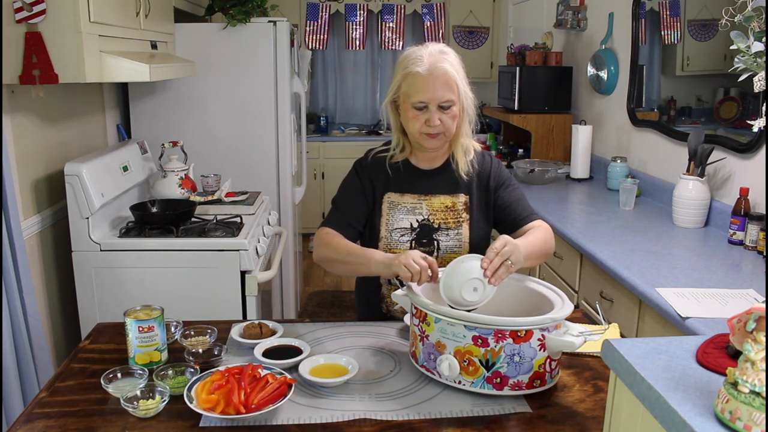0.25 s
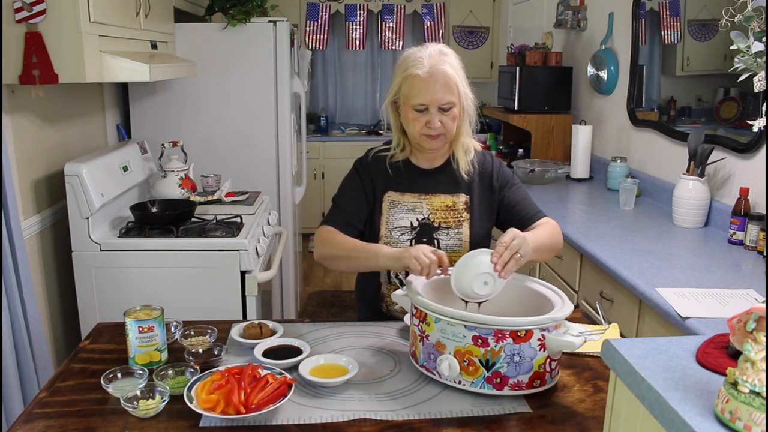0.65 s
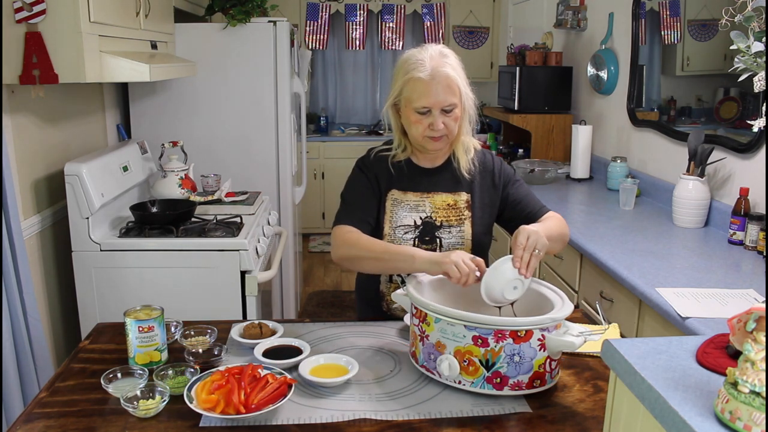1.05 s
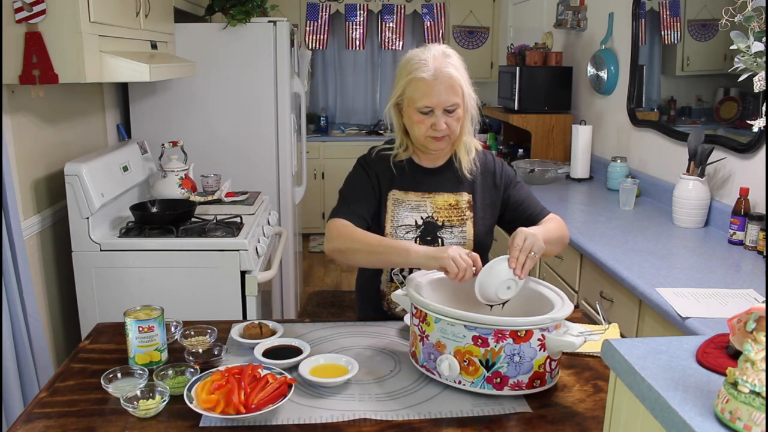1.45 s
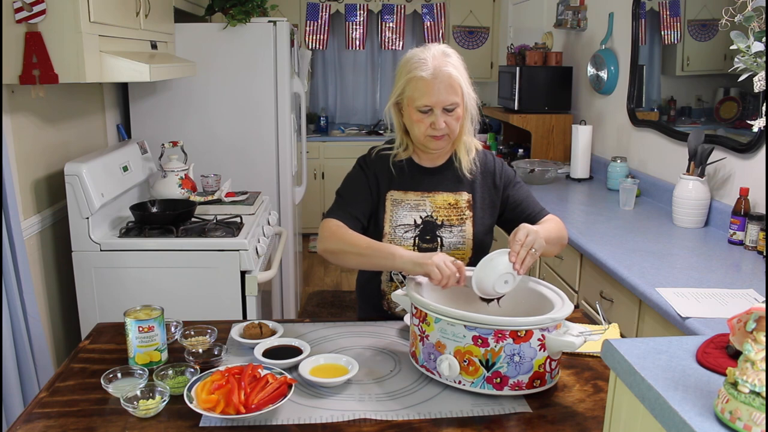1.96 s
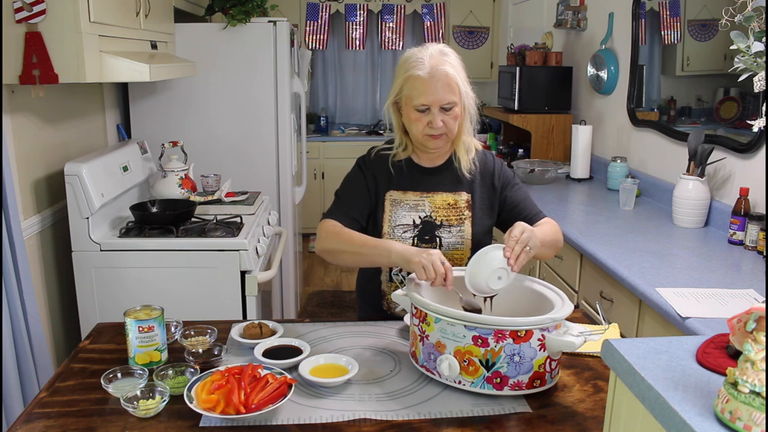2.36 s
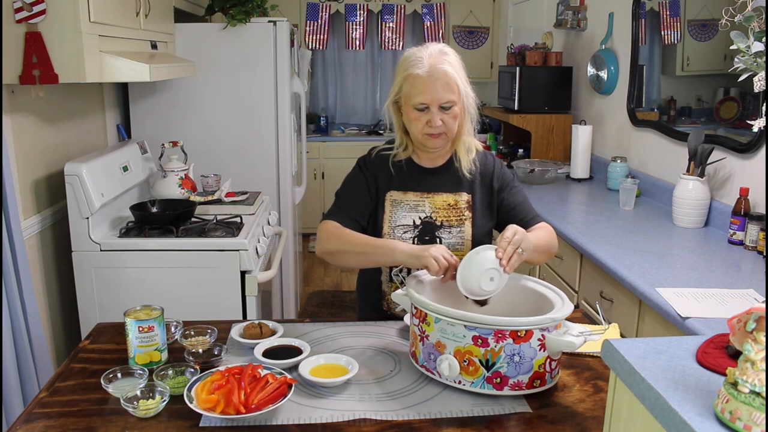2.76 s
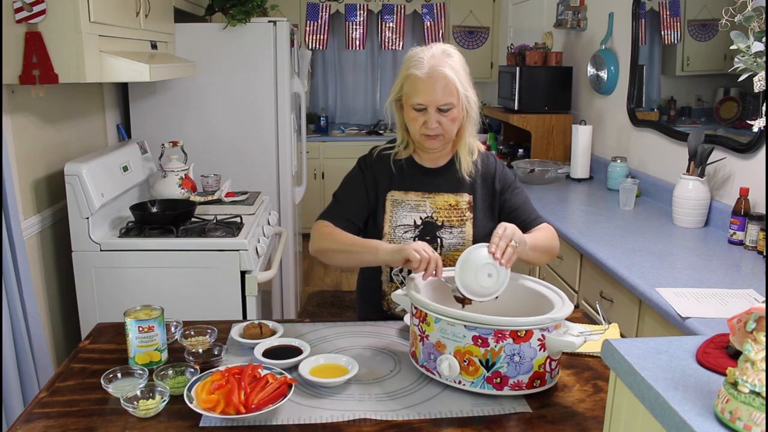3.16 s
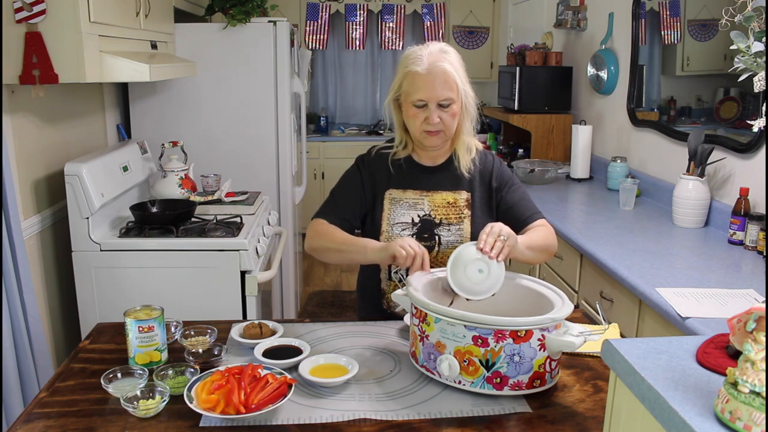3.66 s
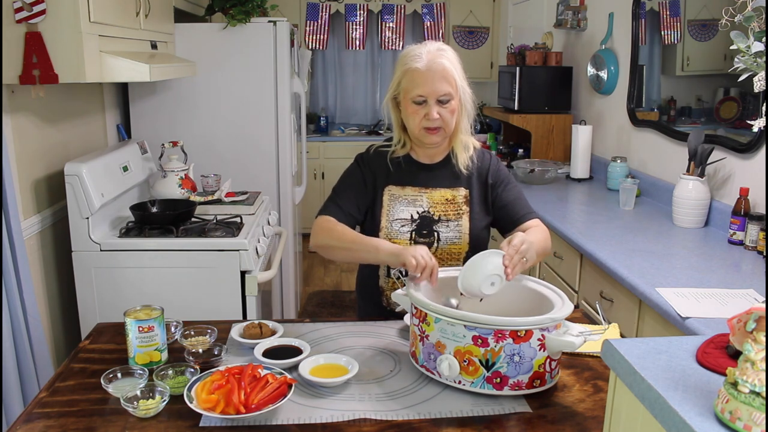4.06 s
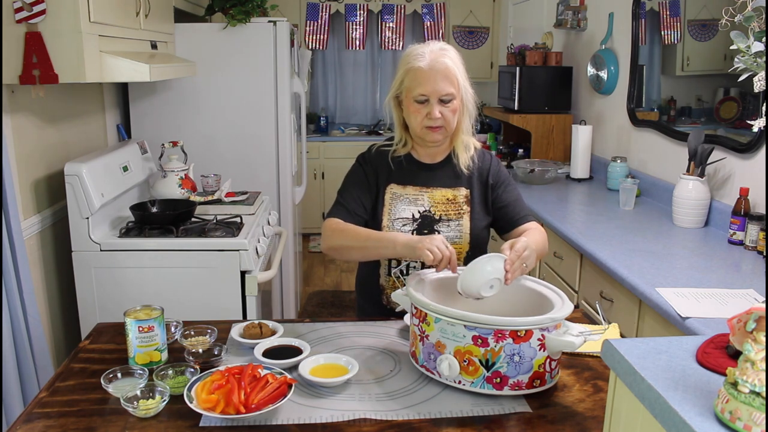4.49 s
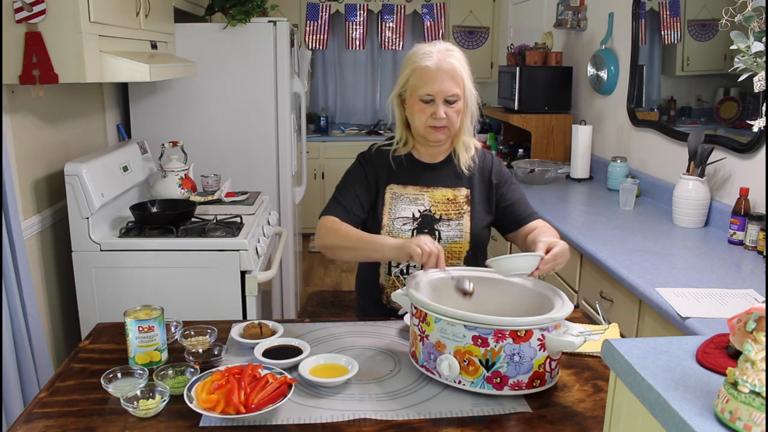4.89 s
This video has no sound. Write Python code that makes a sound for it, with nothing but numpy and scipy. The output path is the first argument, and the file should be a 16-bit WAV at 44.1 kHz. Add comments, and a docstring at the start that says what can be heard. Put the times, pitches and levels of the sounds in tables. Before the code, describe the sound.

In a home kitchen, thick sauce is knocked from a hand-held ceramic bowl with a metal spoon. Loud dry clinks come first, then a hollow stoneware double thud, quieter spoon contacts, faint rasps and wet smears, and a late hard clink with a scrape. Light pot taps end it. Short room echo, quiet hum and air; the microphone clips a little on the hardest blows.

```python
"""A metal spoon knocks thick sauce out of a small hand-held ceramic bowl, over a stoneware cooking pot.
Hard clinks come first, short because the hand damps the bowl: decaying modes, filtered cracks and echoes.
A dull double knock of the pot falls among them; then random stick-slip pulses make scrapes and smears, and single
filtered pulses make small ticks, with sparser clinks and more pot knocks; a last smear runs to the end.
Mains hum and filtered room noise lie underneath throughout; the hardest clinks overload the microphone."""
import sys
import numpy as np
from scipy import signal
from scipy.fft import next_fast_len
from scipy.io import wavfile

SR = 44100
rng = np.random.default_rng(int(sys.argv[2]) if len(sys.argv) > 2 else 0)


def to_wav(sig):
    """Store sig (one row per channel, or 1-D mono) as 16-bit WAV at the path in sys.argv[1].

    Samples outside -1..1 are clipped; the rate is SR.
    """
    pcm = np.clip(np.atleast_2d(sig), -1, 1) * 32767
    pcm = np.round(pcm).astype(np.int16)
    wavfile.write(sys.argv[1], SR, pcm.T)  # frames by channels


N = 226233


def amp(db):
    """Decibels to gain."""
    return 10 ** (np.asarray(db) / 20)


def unit(x):
    """Scales a sound to rms 1."""
    return x / np.sqrt(np.mean(x ** 2) + 1e-20)


def read(points, hz):
    """Reads a (frequency, value) table along a log-frequency axis."""
    f, value = np.transpose(points)
    return np.interp(np.log(hz + 1), np.log(f + 1), value)


def add(mix, s, sound):
    """Mixes a sound in at time s, cut where the mix ends."""
    part = mix[round(s * SR):][:len(sound)]
    part += sound[:len(part)]


def colour(x, points, tilt_db=0):
    """Minimum-phase filter with the given spectrum, tilted about 2 kHz by some dB an octave."""
    size = next_fast_len(len(x) + SR // 10)
    hz = abs(np.fft.fftfreq(size, 1 / SR))
    octaves = np.log2(np.maximum(hz, 200) / 2000)  # the tilt stops below 200 Hz
    log_gain = np.log(amp(read(points, hz) + tilt_db * octaves))
    response = np.exp(np.conj(signal.hilbert(log_gain)))  # causal: nothing sounds before the contact
    return np.fft.ifft(np.fft.fft(x, size) * response).real[:len(x)]


def fade(t, t60):
    """Exponential decay, 60 dB down after t60 seconds."""
    return np.exp(-np.log(1000) * t / t60)


def ring(modes, tilt_db=0, pivot_hz=1000):
    """Struck modes as decaying sines of alternating sign; the tilt in dB an octave weights the high ones."""
    t = np.arange(SR // 3) / SR
    total = 0
    for k, (hz, db, t60) in enumerate(modes):
        level = amp(db + tilt_db * np.log2(hz / pivot_hz))
        total = total + level * fade(t, t60) * np.sin(2 * np.pi * hz * t) * (-1) ** k
    return total


def pulse(points, tilt_db=0):
    """One contact: a push of energy 1 with the given spectral shape."""
    push = colour(signal.unit_impulse(SR // 20), points, tilt_db)
    return push / np.linalg.norm(push)


def stroke(start, press, end, swell, per_s, spread_db):
    """Pressure builds and lets go over one stroke: its gain, and its random stick-slip pulses."""
    t = np.arange(start, end, 1 / SR)
    size = amp(spread_db * np.minimum(rng.exponential(1, len(t)), 4)) * rng.choice([-1, 1], len(t))
    pulses = size * (rng.random(len(t)) < per_s / SR)
    pressure = np.interp(t, [start, press, end], [0, 1, 0]) ** swell
    return pressure, pulses


def kitchen(x, early_db, tail_db, direct_db=0, early_t60=.07, gap_s=0.0039):
    """Direct sound, quick echoes from bowl, pot and table, and the room's tail; paths are new for each sound."""
    # room decay: (frequency [Hz], t60 [s])
    room_decay = [(200, 0.46), (700, 0.39), (2300, 0.44), (5600, .37), (10000, 0.34), (15000, 0.2563)]
    t = np.arange(2 * SR // 3) / SR
    # sparse echoes of random sign, about 8000 a second
    near, far = rng.choice([-1., 1.], (2, len(t))) * (rng.random((2, len(t))) < 8000 / SR)
    near = near * (t > .0004) * fade(t, early_t60)
    # the tail is silent for one gap and rises over a second one
    hz, frame_s, z = signal.stft(far * np.clip(t / gap_s - 1, 0, 1), SR, nperseg=256)
    decay = fade(frame_s, read(room_decay, hz)[:, None])
    tail = signal.istft(z * decay, SR, nperseg=256)[1][:len(t)]
    paths = amp(early_db) * near / np.linalg.norm(near) + amp(tail_db) * tail / np.linalg.norm(tail)
    paths[0] += amp(direct_db)
    return signal.fftconvolve(x, paths)


def clinks():
    """Each blow rings bowl and spoon, then may rebound; its crack starts in the bowl and comes mostly by echoes."""
    # spoon on bowl: (time [s], force [dB], nearness to the rim [dB], spoon's own ring [dB],
    # crack tilt [dB/octave], main ring pitch [factor], ring length [factor],
    # rebound delay [s], rebound gain [factor])
    blows = [(0.1024, 10, -16.5, -23, -1, 1, 2, .008, 1.1),
             (0.4502, 9.5, 3, -23.5, 0.05, 0.99, 1.01, .0116, 0.35),
             (0.7787, 13, -4.5, -33.5, 1.5, 0.99, 0.89, 0, 0.11),
             (1.0765, 6.5, 1, -20, -1.7, .988, 1.01, .0105, 0.85),
             (1.6457, 0.5, 4, -24, -1.6, .995, 1.43, 0, 0),
             (2.5563, -6.5, -9.5, -16, 5.5, 1.01, 1.4, 0, 0.072),
             (4.262, 8.5, 4.5, -51, 1, 1.012, 0.68, .106, 0.083)]
    # spectral shape of the crack: (frequency [Hz], relative level [dB])
    crack_shape = [(100, -24), (400, -15.5), (600, -17), (850, -3), (1400, 2), (2500, 3), (3500, 3.5),
                   (4300, 2), (6000, 1), (7000, -2), (10000, -1), (15000, -7.5)]
    # the spoon falls back softly and stays in touch: less treble, set ring length
    rebound_dull_db, rebound_length = -11, 0.95
    out = np.zeros(N)
    for s, force_db, rim_db, spoon_db, crack_tilt, pitch, length, rebound_s, rebound_gain in blows:
        blow = s, force_db, rim_db, spoon_db, pitch
        add(out, s, chime(*blow, length))
        crack = amp(force_db) * pulse(crack_shape, crack_tilt)
        add(out, s, kitchen(crack, early_db=0, tail_db=-5.5, direct_db=-9.0, early_t60=0.084))
        add(out, s + rebound_s, rebound_gain * chime(*blow, rebound_length, rebound_dull_db))
    return out


def chime(s, force_db, rim_db, spoon_db, pitch, length, dull_db=0):
    """Bowl and spoon ring together; force and landing place set the weight of each mode family."""
    # a harder blow is a shorter contact, so higher modes grow faster; rows are low, main and high ring:
    # (level at force 0 [dB], growth with force [dB/dB], growth with nearness to the rim [dB/dB])
    bowl_response = [(-23, 1.2467, 0), (-15.5, 1.5754, 0.5), (-26.5, 2, 1)]
    # spoon modes in two families: (frequency [Hz], relative level [dB], t60 [s])
    spoon_low = [(3203, -10, 0.023), (4705, 0, 0.014), (4784, -8, 0.0083), (7650, -8.5, 0.014),
                 (7905, -6, 0.036)]
    spoon_high = [(11700, -5, .03), (11830, 0, .04), (14780, -8, .03)]
    low_db, main_db, high_db = np.dot(bowl_response, [1, force_db, rim_db])
    # high spoon modes against the low ones: -14.5 dB at force 0, 1.6 dB more per dB of force
    spoon_high_db = -14.5 + 1.6 * force_db + dull_db
    spoon = ring(spoon_low) + amp(spoon_high_db) * ring(spoon_high)
    body = bowl(low_db, main_db, high_db + dull_db, low_pitch(s), pitch, length)
    return kitchen(body + amp(force_db + spoon_db) * spoon, early_db=-5.5, tail_db=-7.0)


def low_pitch(s):
    """Pitch factor of the bowl's low modes at time s: they climb as the sauce leaves."""
    full_hz, emptying_hz_per_s, table_hz = 2283, 38, 2300  # table_hz: where the factor is 1
    return (full_hz + emptying_hz_per_s * s) / table_hz


def bowl(low_db, main_db, high_db, low_factor, main_pitch=1, length=1):
    """The bowl's ring: low modes follow the load of sauce, main ones shift with the grip, high ones stay."""
    # close pairs of modes, and broad ones that the touching spoon chokes, before pitch and length factors:
    # (frequency [Hz], relative level [dB], t60 [s])
    low_modes = [(2285.5, -3, 0.055), (2352, -3.5, .05), (2433, -5, 0.027)]
    main_modes = [(5197, -11, 0.013), (5472, -2, 0.024), (5594, 0, 0.04), (5692, -8.5, 0.036),
                  (5805, -8.5, 0.034), (6263, -15, 0.018)]
    high_modes = [(9720, -5, .02), (9900, 0, .035), (10120, -4, .04), (13700, -12, .025), (14930, -7, .03)]
    low = ring(np.multiply(low_modes, [low_factor, 1, length]))
    main = ring(np.multiply(main_modes, [main_pitch, 1, length]))
    high = ring(np.multiply(high_modes, [1, 1, length]))
    return amp(low_db) * low + amp(main_db) * main + amp(high_db) * high


def clacks():
    """A short dry clack under two of the clinks, perhaps the spoon catching the pot's rim: a filtered pulse."""
    # clacks: (time [s], level [dB])
    hits = [(0.1035, -2), (2.556, -3.5)]
    # spectral shape of the clack: (frequency [Hz], relative level [dB])
    clack_shape = [(200, -22.5), (600, -13), (1000, -8), (1420, 1), (1750, -6), (2300, -6.5), (2800, -23.5),
                   (15000, -37.5)]
    out = np.zeros(N)
    for s, db in hits:
        clack = amp(db) * pulse(clack_shape)
        add(out, s, kitchen(clack, early_db=1, tail_db=-3.0, direct_db=0.0, early_t60=0.038))
    return out


def knocks():
    """The heavy pot answers with low modes and a thud that echoes round its cavity."""
    # knocks on the pot: (time [s], force [dB], ring tilt [dB/octave], thud tilt [dB/octave])
    hits = [(1.2146, -2.5, -3, 5.5), (1.2270, -3, -2, 1), (3.4362, -11.5, -3, 2.5), (3.7353, -18.5, -8, -1),
            (3.759, -25, -11.5, -2), (4.6210, -28.5, -13.5, -1.5), (4.8936, -12.5, -1, -1.5),
            (4.9270, -11.5, 2, -2), (4.9620, -21.5, 2, -3)]
    # pot modes before the tilt: (frequency [Hz], relative level [dB], t60 [s])
    pot_modes = [(237, -11, 0.16), (300.3, -11.5, 0.23), (373, -22.5, 0.061), (466.5, -1, 0.048),
                 (574.5, -10, 0.16), (672, -1, 0.094), (733, 3, 0.12), (807, -3, 0.043), (873, -3, 0.088),
                 (996, -37, 0.023), (920, -2, 0.026)]
    # spectral shape of the thud before the tilt: (frequency [Hz], relative level [dB])
    thud_shape = [(100, -38), (220, -0.5), (800, 11), (1500, 1.5), (2800, -2.5), (3900, -6), (4500, -15.5),
                  (9000, -32), (15000, -48)]
    pot_db = -23  # pot's ring against the thud
    out = np.zeros(N)
    for s, force_db, ring_tilt, thud_tilt in hits:
        pot = amp(force_db + pot_db) * ring(pot_modes, ring_tilt, pivot_hz=666.2)
        add(out, s, kitchen(pot, early_db=-0.5, tail_db=0))
        thud = amp(force_db) * pulse(thud_shape, thud_tilt)
        add(out, s, kitchen(thud, early_db=3.5, tail_db=0.5, direct_db=-10, early_t60=0.13))
    return out


def scrapes():
    """The spoon's edge slips over the glaze and rasps; the bowl rings on, shortened by the contact."""
    # spoon dragged over the glaze: (start [s], hardest press [s], end [s], level [dB],
    # bowl ring against the rasp [dB])
    drags = [(1.781, 1.825, 1.938, -44, -4.5), (3.45, 3.7, 4.18, -61.5, -20),
             (4.286, 4.385, 4.39, -34, 2.5)]
    # spectral shape of the rasp: (frequency [Hz], relative level [dB])
    rasp_shape = [(500, -40), (1150, -3.5), (1400, 0.5), (1600, -3.5), (1820, 6), (2150, -6.5), (2450, 9),
                  (2900, -16.5), (3800, -4.5), (4500, -13), (5700, 1.5), (7500, -29), (10000, -17),
                  (15000, -21)]
    out = np.zeros(N)
    for start, press, end, db, ring_db in drags:
        pressure, slips = stroke(start, press, end, swell=1.43, per_s=1300, spread_db=0.5)
        body = bowl(low_db=-7.0, main_db=1.0, high_db=-20.0, low_factor=low_pitch(press),
                    main_pitch=1.012, length=0.68)
        rung = unit(signal.fftconvolve(slips, body)[:len(slips)])
        rasp = unit(colour(slips, rasp_shape))
        scrape = amp(db) * pressure * (rasp + amp(ring_db) * rung)
        add(out, start, kitchen(scrape, early_db=1.0, tail_db=-5.5, direct_db=-1.5))
    return out


def sauce():
    """Thick sauce smears softly in random grains and lets go in small sticky ticks, each one filtered pulse."""
    # sauce smeared along the wall: (start [s], hardest press [s], end [s], level [dB])
    smears = [(1.881, 2.053, 2.37, -61.5), (3.719, 3.92, 4.19, -61), (4.522, 4.697, 5.23, -60)]
    # spectral shape of a smear: (frequency [Hz], relative level [dB])
    smear_shape = [(300, -7), (700, 0), (1100, 3), (1400, -8), (2500, -17), (6000, -30)]
    # small sticky ticks: (time [s], level [dB], centre frequency [Hz])
    ticks = [(1.966, -28, 1833), (2.7905, -35, 9000), (3.737, -27, 7320), (4.085, -30, 2387),
             (4.086, -35.5, 5000), (4.161, -39, 2480), (4.528, -34.5, 9450)]
    out = np.zeros(N)
    for start, press, end, db in smears:
        pressure, grains = stroke(start, press, end, swell=0.64, per_s=510, spread_db=4)
        smear = amp(db) * pressure * unit(colour(grains, smear_shape))
        add(out, start, kitchen(smear, early_db=-4, tail_db=-1.5))
    side = 2 ** 1.2  # a tick's band is 24 dB down 1.2 octaves either side
    for s, db, hz in ticks:
        tick = amp(db) * pulse([(hz / side, -24), (hz, 0), (hz * side, -24)])
        add(out, s, kitchen(tick, early_db=-1.5, tail_db=-4, direct_db=-1.5, early_t60=0.12))
    return out


def background():
    """Steady room noise and low rumble from filtered noise, with electrical hum from sines."""
    # mains and appliance drone: (frequency [Hz], rms level [dB])
    hum_tones = [(60, -55), (205, -67), (275, -75)]
    # spectral shape of the room noise: (frequency [Hz], relative level per Hz [dB])
    air_shape = [(47, -43), (80, -10.5), (91, -11.5), (158, -11.5), (197, -2.5), (230, -10.5), (281, -2),
                 (350, -11.5), (635, -17.5), (725, -22), (791, -14), (1010, -21), (1790, -24), (2280, -28),
                 (15500, -31)]
    # (frequency [Hz], relative level [dB])
    rumble_shape = [(15, -8.5), (45, -0.5), (90, -6.0), (200, -30.5), (800, -66.5)]
    t = np.arange(N) / SR
    hum = sum(np.sqrt(2) * amp(db) * np.sin(2 * np.pi * (hz * t + rng.random())) for hz, db in hum_tones)
    rumble = unit(colour(rng.standard_normal(N), rumble_shape))
    air = unit(colour(rng.standard_normal(N), air_shape))
    return hum + amp(-56) * air + amp(-70.0) * rumble


def scene():
    """All sources at one microphone."""
    return (clinks() + clacks() + knocks() + scrapes() + sauce() + background())[None]


def record(dry, ceiling=1.8):
    """The microphone rounds off the loudest peaks towards its ceiling; then the treble is cut off."""
    edge_hz = 15750
    held = dry / (1 + (dry / ceiling) ** 6) ** (1 / 6)
    lowpass = signal.firwin(401, edge_hz, window=("kaiser", 9), fs=SR)
    return signal.oaconvolve(held, lowpass[None], "same")


dry = scene()
out = record(dry)
to_wav(out)
```